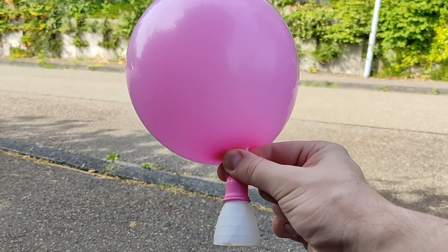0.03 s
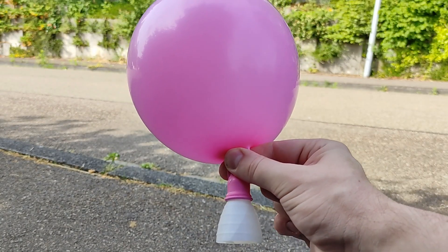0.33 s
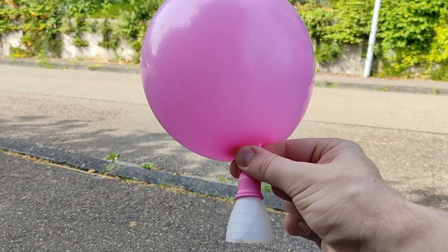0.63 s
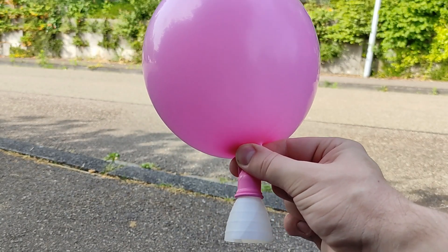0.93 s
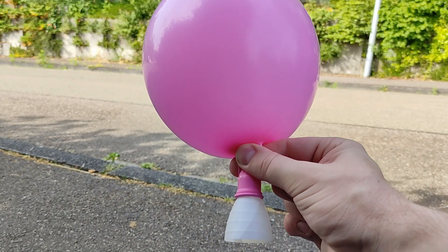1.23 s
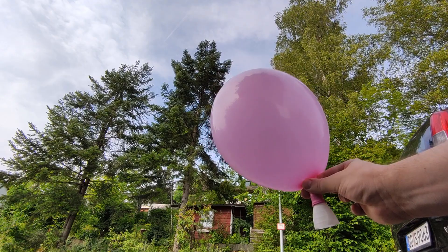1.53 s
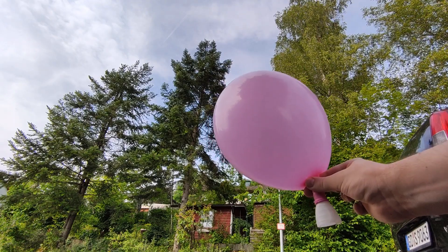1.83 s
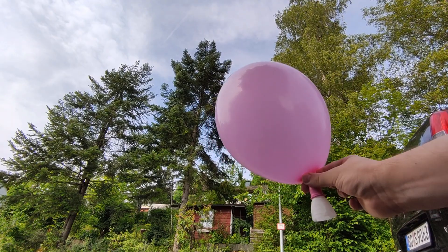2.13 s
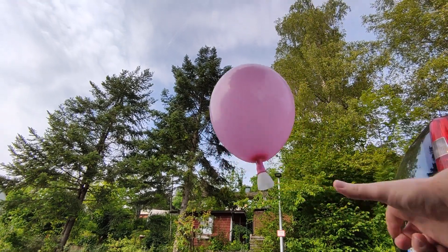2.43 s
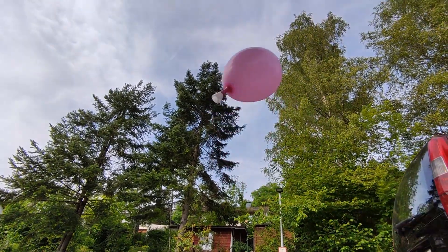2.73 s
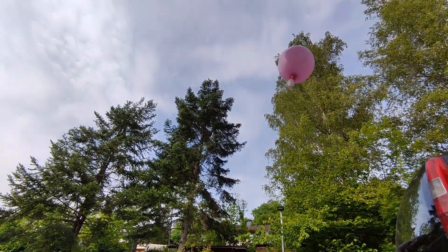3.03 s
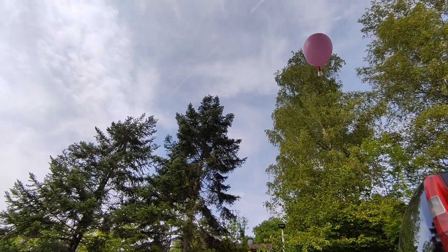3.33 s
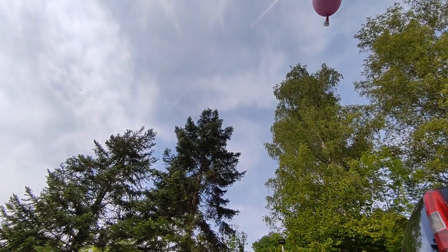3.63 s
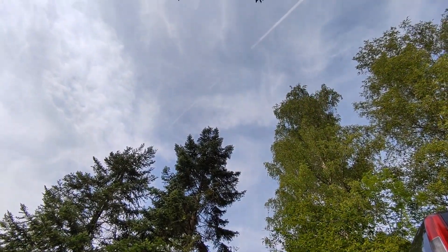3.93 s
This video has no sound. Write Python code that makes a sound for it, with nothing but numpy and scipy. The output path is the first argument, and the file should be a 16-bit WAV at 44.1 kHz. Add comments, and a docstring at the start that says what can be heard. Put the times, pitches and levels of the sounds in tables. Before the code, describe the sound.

A released balloon hisses away outdoors. First there is only soft street hiss and a faintly whistling bird. The sound drops out briefly at 1.35 seconds and returns with distant engine rumble. At 2.3 seconds rubber rubs, air spurts, and the neck pops and slaps. The jet of air then fades, with a short buzz at 2.5 and light ticks at 3.2 seconds, while bird and engines continue.

```python
"""A quiet street hisses softly while a bird whistles in the trees. At 1.35 s the sound drops out for a
moment, then returns with the rumble of far engines. At 2.3 s a balloon with a small nozzle is let go:
fingers rub off its neck, air spurts out, and the freed neck pops and slaps the skin. The jet of air
hisses away into the sky, fading as it climbs. In flight the neck buzzes at 2.5 s and the nozzle ticks
at 3.2 s, while the bird and the engines carry on."""
import sys
import numpy as np
from scipy import signal
from scipy.fft import rfft, irfft, next_fast_len
from scipy.io import wavfile
from scipy.ndimage import uniform_filter1d, map_coordinates

SR = 44100
rng = np.random.default_rng(int(sys.argv[2]) if len(sys.argv) > 2 else 0)


def store_pcm(level_fs):
    """Save levels as 16-bit WAV."""
    pcm = np.round(np.clip(level_fs, -1, 1) * 32767).astype(np.int16)
    wavfile.write(sys.argv[1], SR, np.atleast_2d(pcm).T)


N = 176400  # 4 s

# Tone colour of the air jet and of the spurts: frequency_hz, left_db, right_db
JET_COLOUR = [(60, -37, -35), (250, -19, -14), (710, -13, -15), (1220, -14, -15), (1740, -7, -7),
              (2380, -12, -13), (3200, -9, -9), (3920, -13.5, -12.5), (4680, -9, -10.5), (5760, -17.5, -20),
              (6550, -12.5, -12), (7600, -14.5, -27), (8500, -1.5, -6.5), (9180, -9, -24),
              (10300, -18, -8.5), (11200, -29, -7.5), (12200, -9, -1), (12650, -18, -15),
              (13800, -16, -12.5), (15300, -26, -21)]
SPURT_COLOUR = [(970, -18, -10), (1480, -3, -3), (2170, -4, -11), (3330, -5, -7), (4170, 6, 5.5),
                (4960, -19, -16), (6000, -32, -26), (7830, -9, -12), (8600, 5.5, -11), (9600, -9, -6),
                (11200, -19, -12), (12400, -7, 2), (12800, -17, -11), (15500, -26, -13)]
# How the tumbling nozzle beams its sound toward or away from us: time_s, treble_db, middle_db
NOZZLE_AIM = [(2.36, 1, 0.5), (2.5, 1, 0), (2.66, 0.5, 3), (2.88, -0.5, -0.5), (3.05, -0.5, 1),
              (3.25, -0.5, -3), (3.42, -4.5, -3), (3.7, -3, -2), (4, -3, -4)]
# Spurts as the neck unpinches: peak_s, level_db, decay_s
AIR_SPURTS = [(2.312, -33, .014), (2.336, -43.5, 0.023), (2.350, -34.5, 0.0048)]
# Rubber sliding and fluttering: middle_s, level_db, half_length_s
RUBBER_SLIPS = [(2.297, -46, 0.0032), (2.305, -44.5, 0.002), (2.373, -42, 0.0054), (2.417, -52.5, 0.016),
                (2.499, -51.5, 0.014), (3.189, -52, .004), (3.223, -52, 0.0065)]
# Tone colour of the sliding rubber: frequency_hz, level_db
RUB_COLOUR = [(50, -30), (200, -13), (450, 3), (650, -4), (900, -1), (1150, -11), (1500, -4), (2100, -14.5),
              (3000, -15), (8000, -43)]
# The neck slaps the balloon, and the nozzle ticks in flight: start_s, level_db
NECK_SLAPS = [(2.3528, -25), (2.3603, -32.5), (2.3715, -31), (2.374, -28), (2.3785, -32), (2.391, -35)]
NOZZLE_TICKS = [(3.188, -45), (3.192, -48), (3.208, -41), (3.2237, -42)]
# Tones that ring in each part of the balloon: pitch_hz, level_db, ring_s (time to fall 60 dB)
SKIN_TONES = [(162.3, -11, 0.15), (302, -10.5, 0.06), (389, 0.5, 0.023), (546, -25, 0.008),
              (780, -26, 0.011), (1454, -10, 0.019), (1800, -21, .012)]
NOZZLE_TONES = [(740, -7, 0.0076), (1570, -14, 0.0084), (1740, -2, 0.013), (3400, -9, 0.0066)]
NECK_TONES = [(650, 0.5, 0.018), (920, -7, .016), (1560, -9, .012)]
# The bird's song: middle_s, half_length_s, pitch_hz, glide_hz_per_s, level_db, waver_hz
BIRD_WHISTLES = [(.06, 0.055, 2210, 1300, -72.5, 18), (0.145, 0.019, 2325, 503, -69.5, 17),
                 (0.281, 0.019, 2194, -1200, -70, 25), (0.897, 0.029, 2490, 1.5, -80.5, 120),
                 (1.078, 0.014, 5860, -1, -81, 90), (1.18, 0.016, 5780, -2, -83, 90),
                 (1.502, 0.039, 1836, -5000, -71.5, 120), (1.691, 0.029, 2440, -400, -69, 94),
                 (1.734, 0.038, 3350, -5000, -77, 100), (1.769, 0.031, 2328, -400, -64, 122),
                 (1.86, 0.031, 2320, -500, -64.5, 90), (1.935, .025, 3210, -500, -78, 60),
                 (1.932, .014, 1525, -6000, -76, 42), (1.98, 0.026, 2215, 1, -74, 46),
                 (2.128, 0.036, 2230, -0.5, -70, 300), (2.246, .022, 3180, -1000, -77, 51),
                 (3.459, 0.045, 3436, 1000, -75, 66), (3.655, 0.023, 2130, 1800, -73, 17),
                 (3.75, 0.037, 2287, 199.5, -61.5, 18.7), (3.808, 0.034, 2130, -2500, -74, 50)]
# Tone colour of the street air around the dropout: frequency_hz, before_db, after_db
STREET_COLOUR = [(25, -30, -29), (43.5, -13, -14), (67.7, -6, 4), (115, 3.5, -3), (200, 0, -0.5),
                 (330, -1, 2), (480, -6, -4.5), (740, -9.5, -9), (1560, -14.5, -14.5), (2160, -21.5, -21),
                 (4500, -23, -25), (7850, -31, -36), (8700, -27, -31.5), (9600, -32.5, -38.5),
                 (12200, -27.5, -30), (15100, -31.5, -34)]
# The street swells before the dropout: time_s, change_db
STREET_SWELLS = [(0, 0), (.15, 0.5), (.33, -0.5), (.65, 1), (.9, 0.5), (1.1, -0.5), (1.21, 1), (1.34, 0)]
# Loudness of the far engines' two drones: time_s, low_db, upper_db
ENGINE_LEVELS = [(1.4, -51.5, -51), (1.6, -53.5, -60), (1.83, -49.5, -55), (2.1, -52.5, -57.5),
                 (2.5, -47.5, -59.5), (2.8, -52, -50.5), (3.15, -53, -55), (3.5, -51, -53),
                 (3.85, -47.5, -49), (4, -48.5, -44)]
# Tone colour of each drone: frequency_hz, level_db
LOW_DRONE_COLOUR = [(30, -44), (62, -13.5), (80, -9), (108, 2), (135, -2), (170, 0.5), (200, -11),
                    (260, -8.5), (500, -68)]
UPPER_DRONE_COLOUR = [(170, -17), (250, -18), (285, 0), (315, -1), (380, -5.5), (420, -14.5), (470, -25),
                      (800, -51.5)]
# How alike left and right are in each noise: frequency_hz, likeness (1 same, 0 unrelated, -1 opposite)
JET_LIKENESS = [(300, 0.61), (1800, 0.43), (2500, 0.33), (3800, -0.32), (6600, -0.019), (8500, -0.13),
                (15000, 0.043)]
SPURT_LIKENESS = [(1000, 0.8), (2000, 0.35), (4200, -0.68), (6500, -0.55), (9500, 0.32), (15000, 0.08)]
RUB_LIKENESS = [(500, 0.65), (2000, 0.55)]
STREET_LIKENESS = [(100, 0.75), (350, 0.55), (800, 0.068), (2000, 0.056), (14000, 0.051)]
DRONE_LIKENESS = [(100, 0.985), (400, 0.95)]

DROP_S, RETURN_S = 1.35, 1.414  # the dropout


def jet(leave_s=2.274, first_doubling_s=0.15, open_s=2.304, rise_s=0.023, close_up_db=-41.5):
    """Churning air hisses out of the nozzle and fades with distance as the balloon climbs."""
    t = clock()
    opening = .5 + .5 * np.tanh((t - open_s) / (.5 * rise_s))
    distance = 1 + np.maximum(t - leave_s, 0) / first_doubling_s
    hiss = patchy(tumbling(rush(JET_COLOUR, JET_LIKENESS)), depth_db=3)
    flutter_db = 0.76 * wobble(110)
    sway_db = wobble(12)
    return opening / distance * amp(close_up_db + flutter_db + sway_db) * beaming(hiss)


def tumbling(hiss, shift_share=.003, rate_hz=14):
    """The swinging nozzle bends every tone in the jet slightly up and down."""
    drift = shift_share * np.cumsum(wobble(rate_hz))
    position = np.clip(np.arange(N) + drift, 0, None)
    return np.array([map_coordinates(side, [position], order=5, mode="mirror") for side in hiss])


def beaming(hiss, middle_below_hz=2920, treble_above_hz=7200):
    """The hiss changes colour as the nozzle points toward or away from the listener."""
    times, treble_db, middle_db = np.transpose(NOZZLE_AIM)
    middle = filtered(hiss, lambda hz: 1 / (1 + (hz / middle_below_hz) ** 4))
    treble = filtered(hiss, lambda hz: 1 - 1 / (1 + (hz / treble_above_hz) ** 6))
    middle_gain = amp(np.interp(clock(), times, middle_db))
    treble_gain = amp(np.interp(clock(), times, treble_db))
    return hiss + middle * (middle_gain - 1) + treble * (treble_gain - 1)


def spurts(rise_s=0.0026):
    """Air bursts through the half-open neck."""
    t = clock()
    level = sum(amp(db) * np.exp(-np.maximum((peak_s - t) / rise_s, (t - peak_s) / decay_s))
                for peak_s, db, decay_s in AIR_SPURTS)
    return level * rush(SPURT_COLOUR, SPURT_LIKENESS)


def pop(peak_s=2.3539, level_db=-24, pitch_hz=323):
    """One low push of air as the neck springs open."""
    spread = (np.pi * pitch_hz * (clock() - peak_s)) ** 2
    return amp(level_db) * (1 - 2 * spread) * np.exp(-spread)


def rubber(rough_db=3):
    """The neck slides in uneven slips, slaps the balloon and shakes the nozzle."""
    friction = unit(amp(rough_db * wobble(350))) * rush(RUB_COLOUR, RUB_LIKENESS)
    rubs = friction * sum(amp(db) * swell(middle_s, half_s) for middle_s, db, half_s in RUBBER_SLIPS)
    slaps = struck(NECK_SLAPS, SKIN_TONES, rise_s=0.00051)
    ticks = struck(NOZZLE_TICKS, NOZZLE_TONES, rise_s=0.00053)
    return rubs + slaps + ticks


def neck_buzz(start_s=2.4937, rate_hz=310, first_db=-42, step_db=-0.9, count=8):
    """The neck flaps shut in a quick, slightly uneven run, like blowing a raspberry."""
    flaps = [(start_s + (k + rng.normal(0, 0.063)) / rate_hz,
              first_db + step_db * k + rng.normal(0, 1.3)) for k in range(count)]
    return struck(flaps, NECK_TONES, rise_s=.0004)


def bird(arch_hz=55, direct_db=-1.5, echo_db=1, echo_s=0.39):
    """A bird's arched, wavering whistles are smeared by the echo of the trees."""
    t, song = clock(), np.zeros(N)
    for middle_s, half_s, hz, glide, db, waver_hz in BIRD_WHISTLES:
        sag_hz = arch_hz * np.minimum(((t - middle_s) / half_s) ** 2, 6)
        pitch_hz = hz + glide * (t - middle_s) - sag_hz + waver_hz * wobble(220)
        tone = unit(np.sin(2 * np.pi * np.cumsum(pitch_hz) / SR))
        song += amp(db) * swell(middle_s, half_s) * tone
    tail = rng.standard_normal((2, SR // 2)) * 1000 ** (-t[:SR // 2] / echo_s)
    echo = signal.fftconvolve(song[None], tail / np.linalg.norm(tail[0]), axes=1)[:, :N]
    return amp(direct_db) * song + amp(echo_db) * echo


def engines(throb_db=1.17):
    """Far engines rumble as two bands of unevenly throbbing noise."""
    times, low_db, upper_db = np.transpose(ENGINE_LEVELS)
    rumble = np.zeros((2, N))
    for db, colour in (low_db, LOW_DRONE_COLOUR), (upper_db, UPPER_DRONE_COLOUR):
        level = amp(np.interp(clock(), times, db) + throb_db * wobble(18))
        rumble += level * rush(colour, DRONE_LIKENESS)
    return rumble


def street(before_db=-59.5, after_db=-59, patchy_db=1.6):
    """Outdoor air hisses softly; after the dropout the engines join it."""
    t, colour = clock(), np.array(STREET_COLOUR)
    swell_db = np.interp(t, *np.transpose(STREET_SWELLS))
    before = amp(before_db + swell_db) * patchy(rush(colour[:, [0, 1]], STREET_LIKENESS), patchy_db)
    after = amp(after_db) * patchy(rush(colour[:, [0, 2]], STREET_LIKENESS), patchy_db) + engines()
    before = left_first(before, lead_radians=.27)
    after = left_first(after, lead_radians=-0.068)
    return np.where(t < (DROP_S + RETURN_S) / 2, before, after)


def struck(blows, tones, rise_s):
    """Every blow rings the same dying tones, a little differently each time."""
    out, t = np.zeros(N + SR), np.arange(SR // 4) / SR
    for start_s, blow_db in blows:
        ring = sum(amp(db + rng.normal(0, 1)) * 1000 ** (-t / ring_s) * np.sin(2 * np.pi * hz * t)
                   for hz, db, ring_s in tones)
        out[round(start_s * SR):][:len(t)] += amp(blow_db) * ring * (1 - np.exp(-t / rise_s))
    return out[:N]


def rush(colour, likeness):
    """Stereo noise of strength 1 with a given tone colour and left-right likeness."""
    def shares(hz):
        angle = np.arccos(np.clip(along(likeness, hz)[0], -.99, .99)) / 2
        return np.array([np.cos(angle), np.sin(angle)])
    shared, opposed = filtered(rng.standard_normal((2, N)), shares)
    stereo = np.array([shared + opposed, shared - opposed])
    return unit(filtered(stereo, lambda hz: amp(along(colour, hz))))


def patchy(x, depth_db):
    """Louder and softer patches, a few hundred Hz wide and tens of ms long; the bass stays even."""
    hz, _, spectrum = signal.stft(x, SR, nperseg=512)
    patches = rng.standard_normal(spectrum.shape[1:])
    patches = uniform_filter1d(uniform_filter1d(patches, size=4, axis=0), size=14, axis=1)
    spare_bass = (hz / (hz + 500))[:, None]
    gain = amp(depth_db * spare_bass * unit(patches))
    return unit(signal.istft(spectrum * gain, nperseg=512)[1][:, :N])


def left_first(x, lead_radians):
    """Waves reach the left side first, or the right if the lead is negative."""
    return filtered(x, lambda hz: np.exp(.5j * lead_radians * np.array([[1], [-1]])))


def filtered(x, response):
    """Multiply each frequency in x by response(hz)."""
    size = next_fast_len(N + SR // 2)
    return irfft(rfft(x, size) * response(np.fft.rfftfreq(size, 1 / SR)), size)[..., :N]


def along(table, hz):
    """Read a table between its rows, on a log frequency scale."""
    row_hz, *columns = np.transpose(table)
    return np.array([np.interp(np.log(hz + 1), np.log(row_hz + 1), column) for column in columns])


def wobble(rate_hz):
    """A smooth curve through rate_hz random points a second."""
    return map_coordinates(rng.standard_normal(int(N * rate_hz / SR) + 4), [clock() * rate_hz])


def swell(middle_s, half_s):
    """A bell-shaped rise and fall."""
    return np.exp(-.5 * ((clock() - middle_s) / half_s) ** 2)


def amp(db):
    """Turn decibels into a gain."""
    return 10 ** (np.asarray(db) / 20)


def unit(x):
    """Scale x to an average strength (rms) of 1."""
    return x / np.sqrt(np.mean(x ** 2) + 1e-20)


def clock():
    """The time of each sample in seconds."""
    return np.arange(N) / SR


def scene():
    """Balloon, bird and street together."""
    return jet() + spurts() + pop() + rubber() + neck_buzz() + bird() + street()


def record(dry, edge_s=0.0057, recover_s=0.19, return_db=-8, low_cut_hz=49, top_hz=15750):
    """The sound drops out and fades back; the microphone thins deep bass and cuts the highest treble."""
    t = clock()
    closing = .5 - .5 * np.tanh((t - DROP_S) / edge_s)
    reopening = .5 + .5 * np.tanh((t - RETURN_S) / (.5 * edge_s))
    recovery = amp(return_db * np.clip(1 - (t - RETURN_S) / recover_s, 0, 1))
    interrupted = dry * (closing + reopening * recovery)
    return filtered(interrupted, lambda hz: (hz < top_hz) * hz ** 2 / np.hypot(hz ** 2, low_cut_hz ** 2))


dry = scene()
out = record(dry)
store_pcm(out)
```